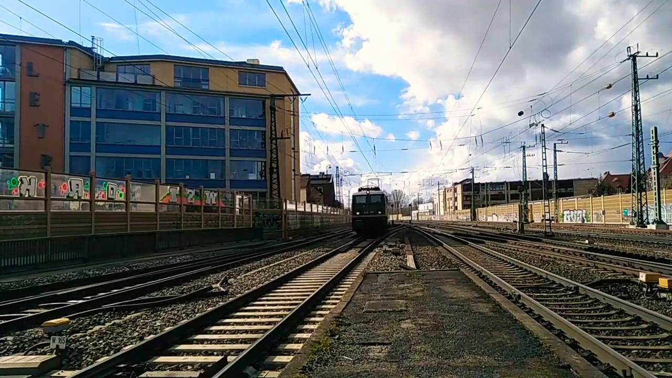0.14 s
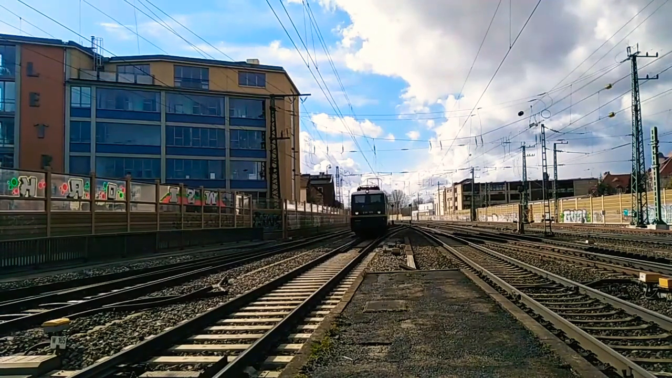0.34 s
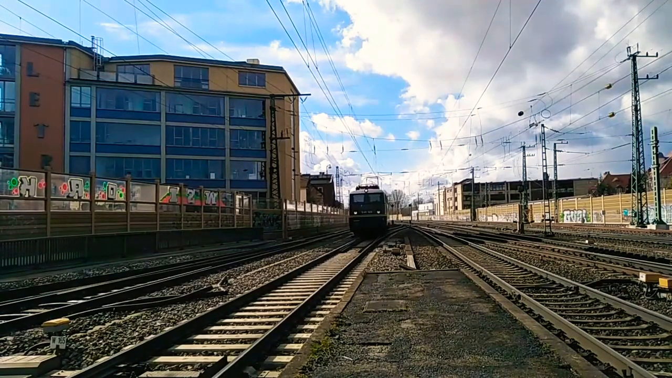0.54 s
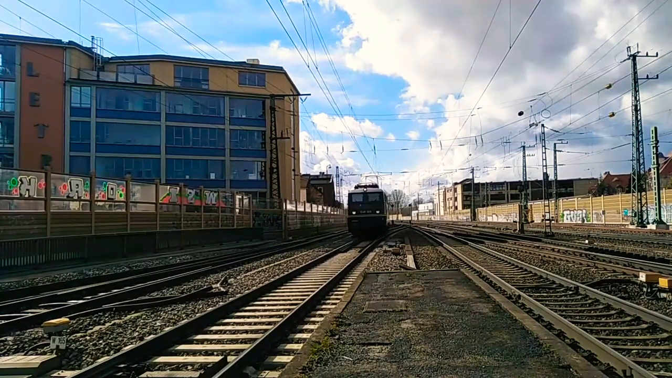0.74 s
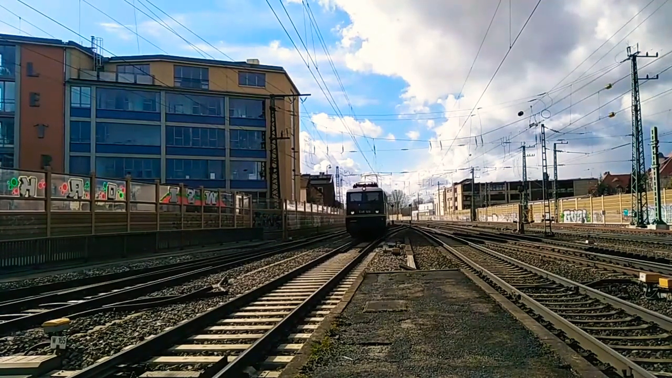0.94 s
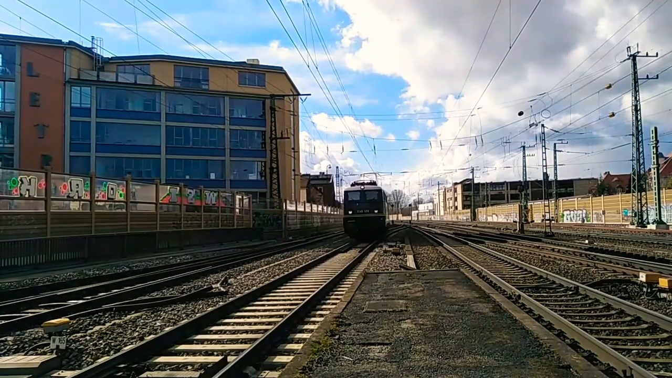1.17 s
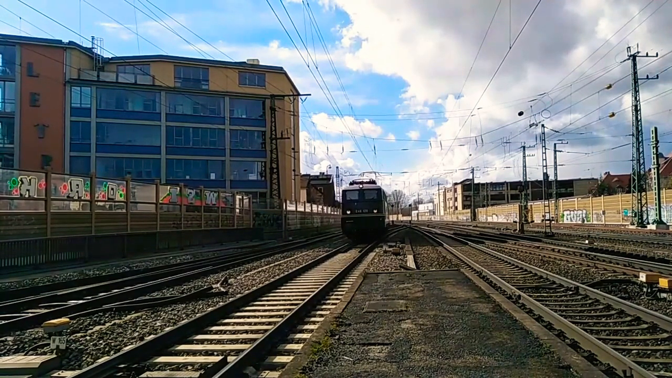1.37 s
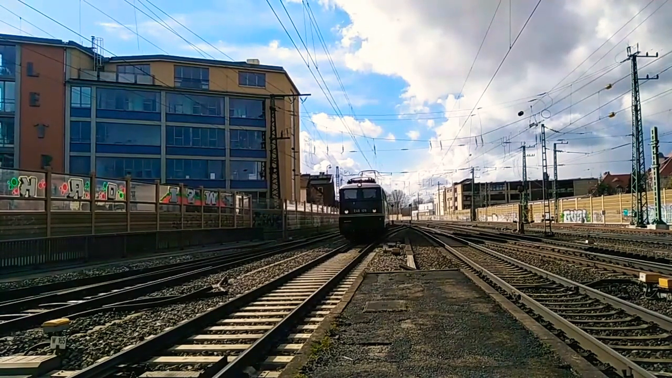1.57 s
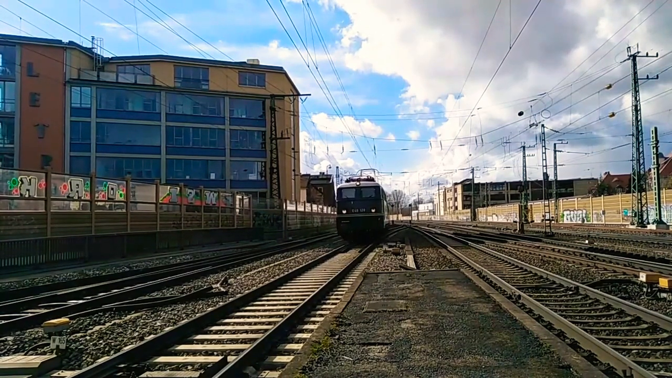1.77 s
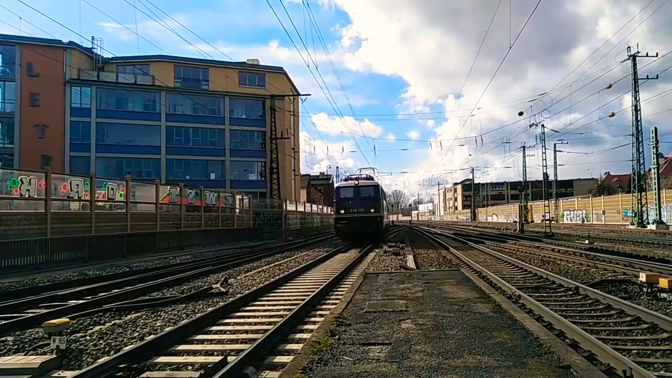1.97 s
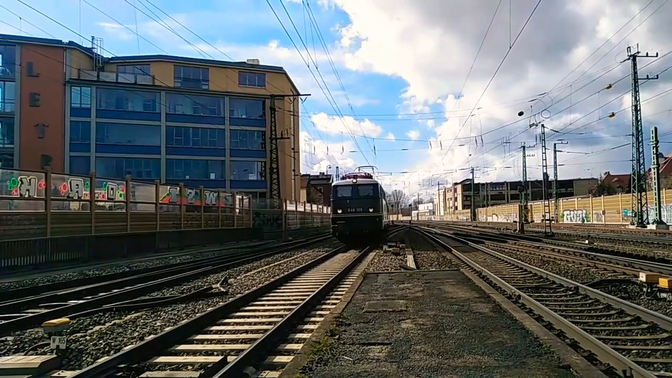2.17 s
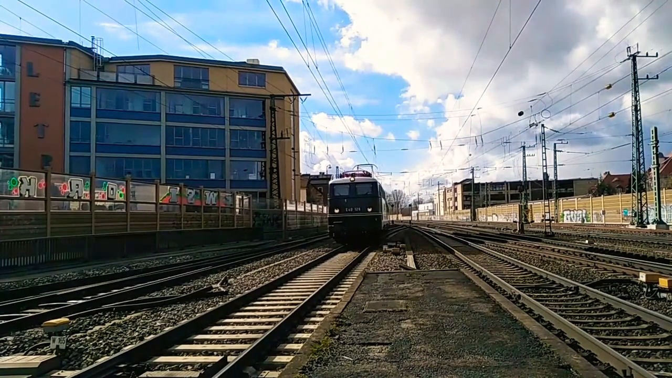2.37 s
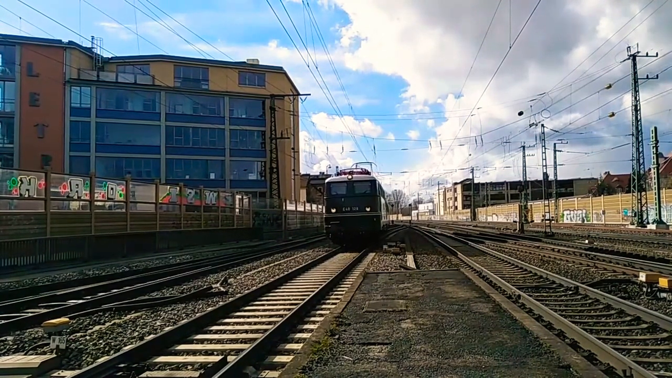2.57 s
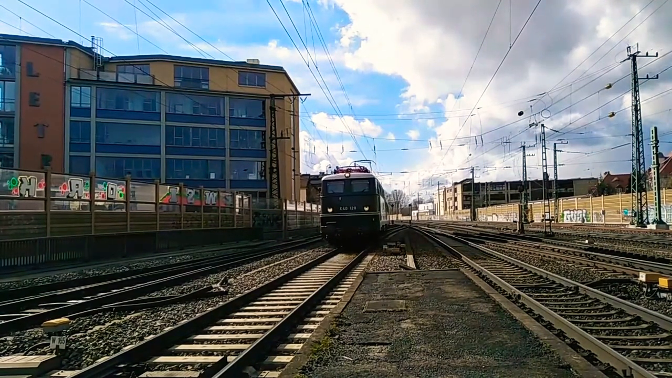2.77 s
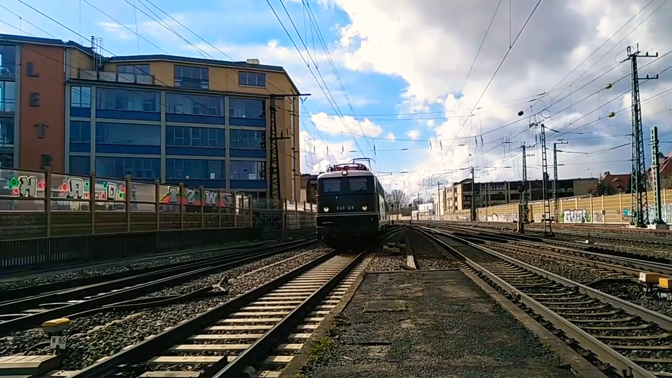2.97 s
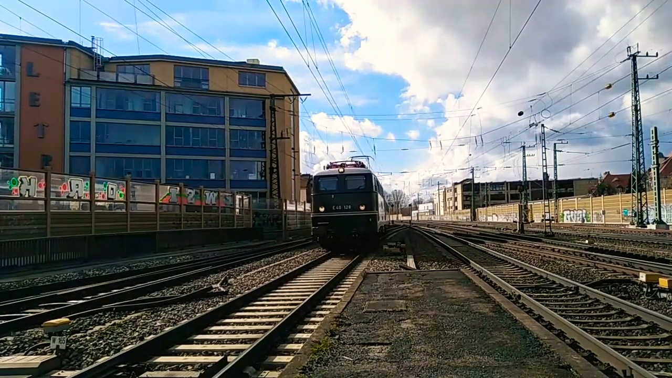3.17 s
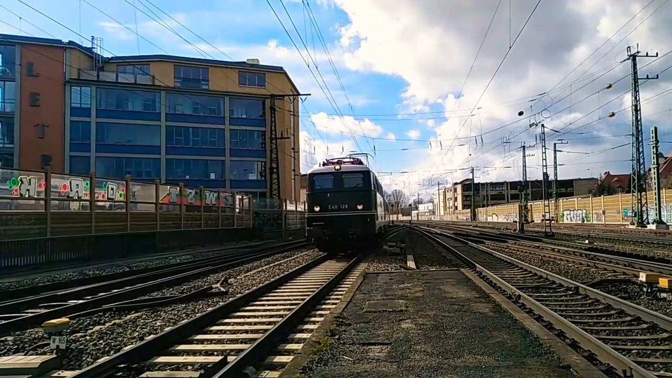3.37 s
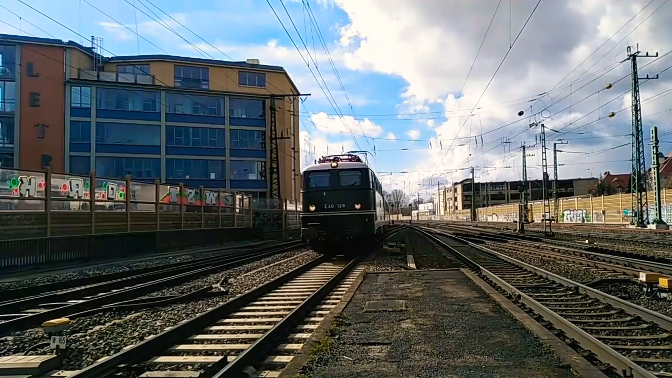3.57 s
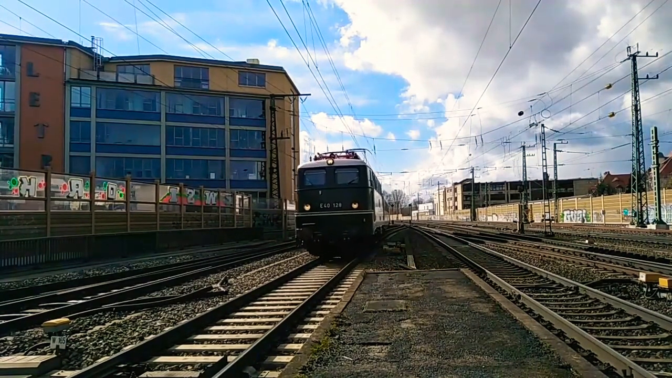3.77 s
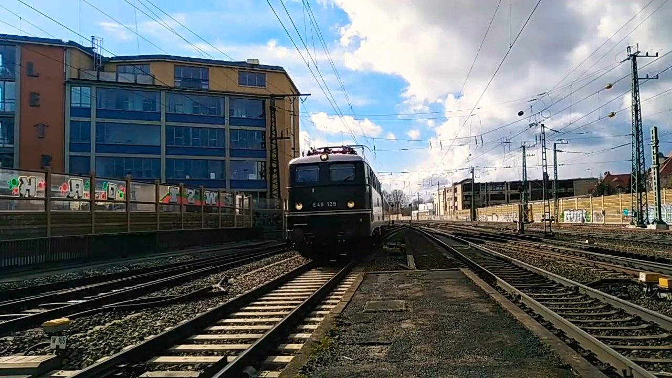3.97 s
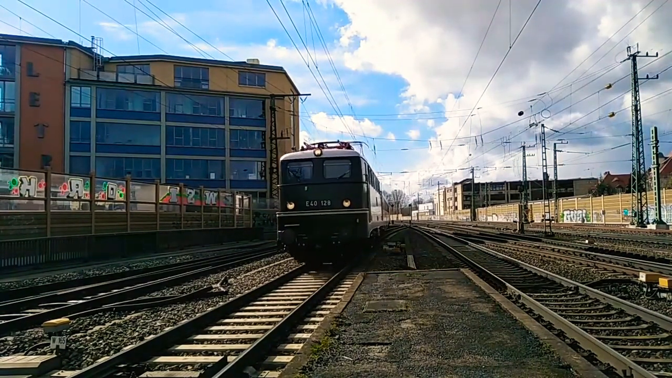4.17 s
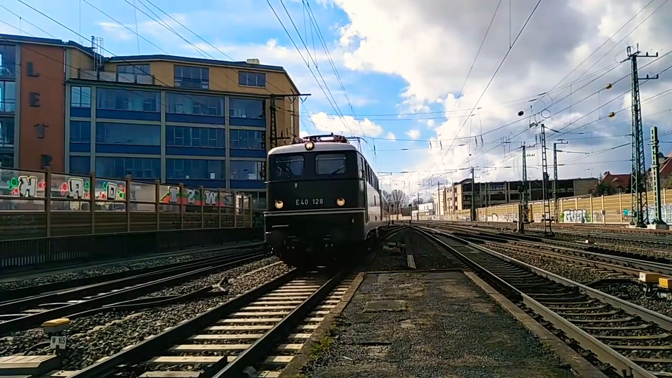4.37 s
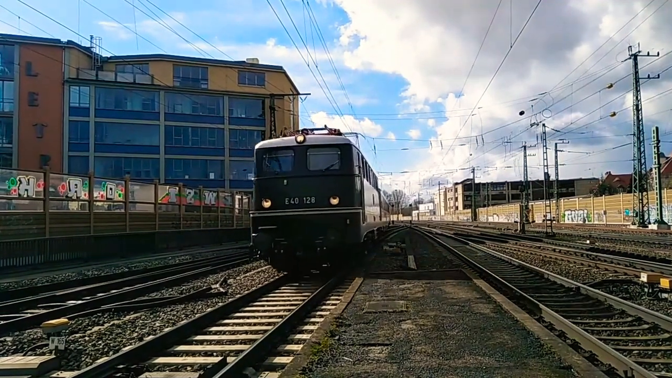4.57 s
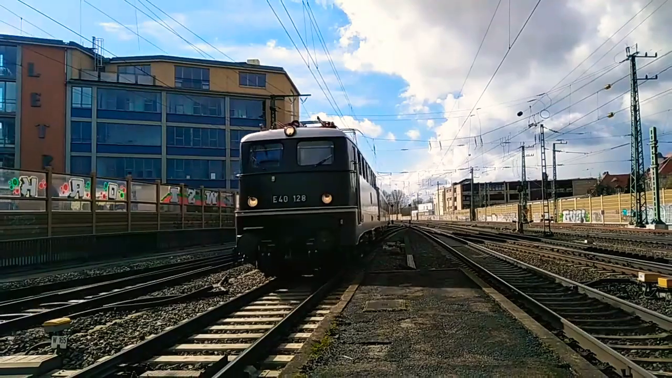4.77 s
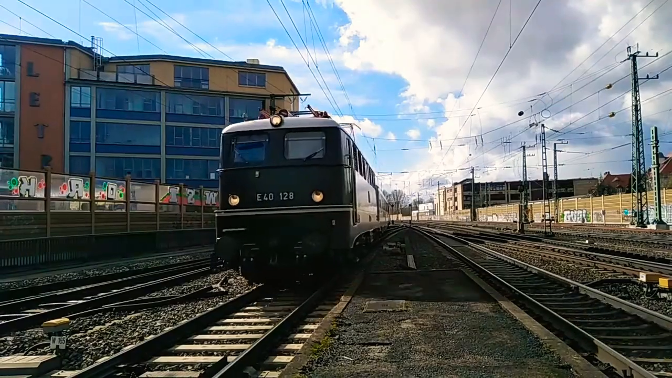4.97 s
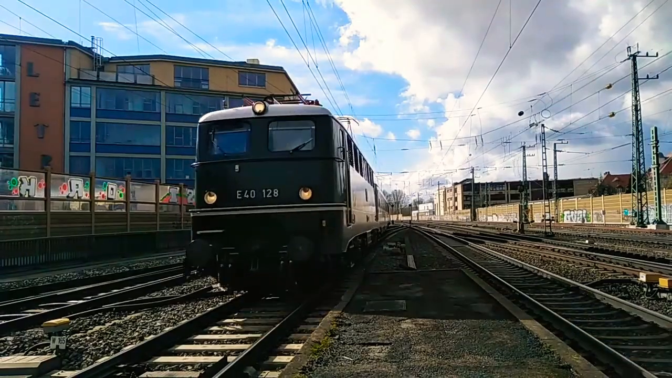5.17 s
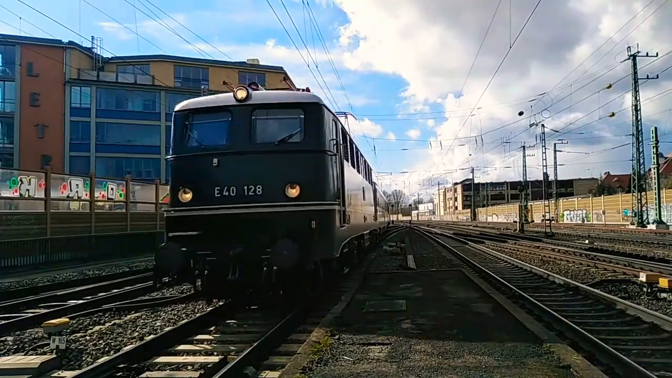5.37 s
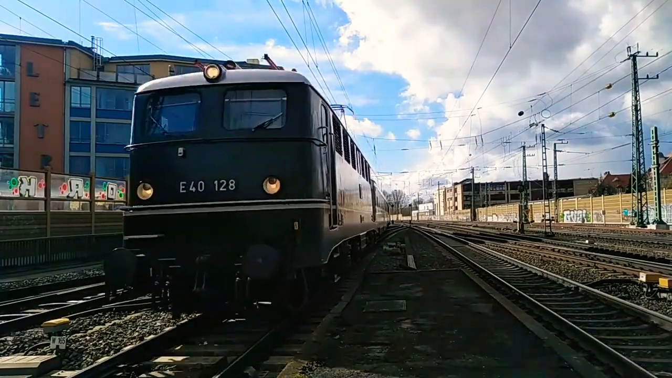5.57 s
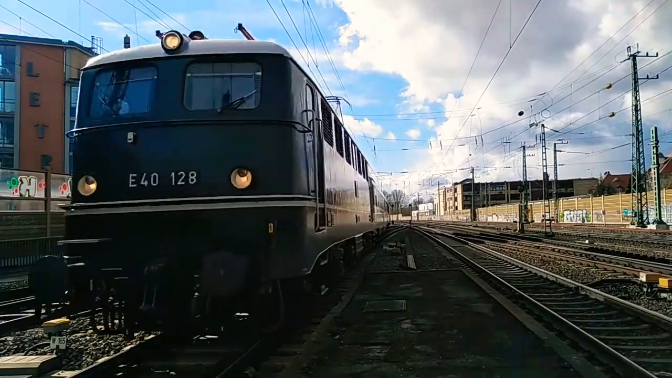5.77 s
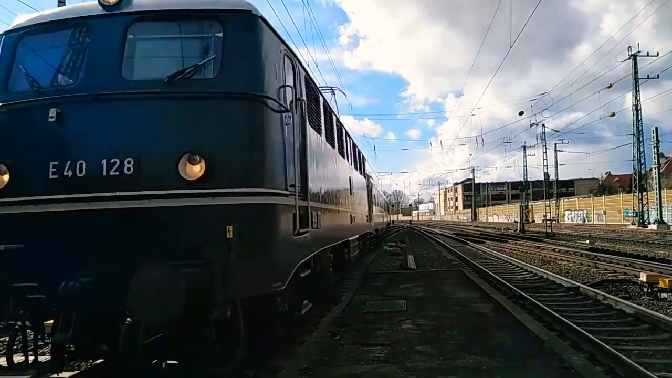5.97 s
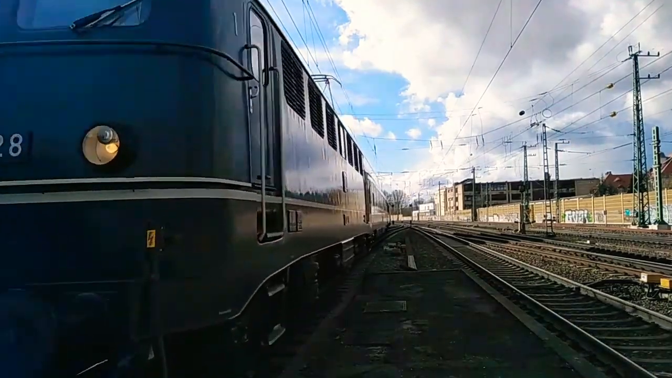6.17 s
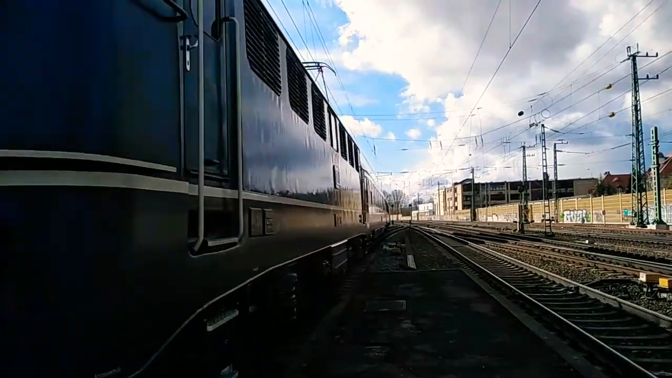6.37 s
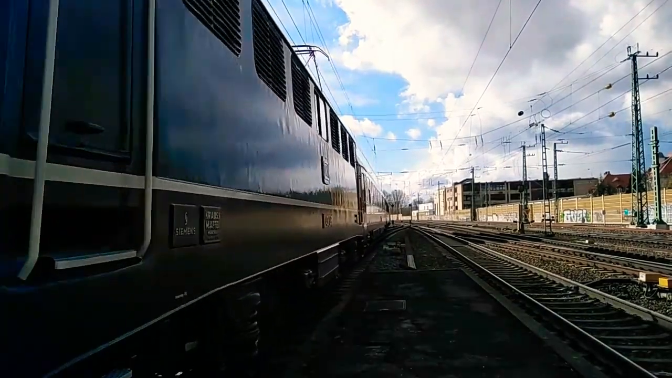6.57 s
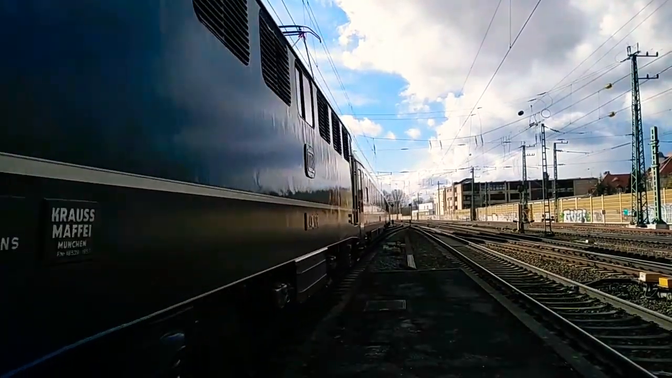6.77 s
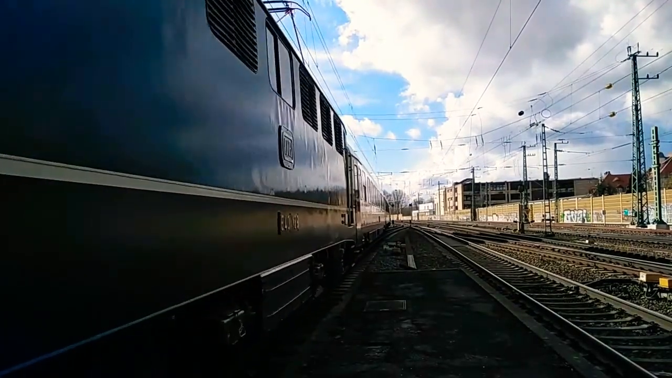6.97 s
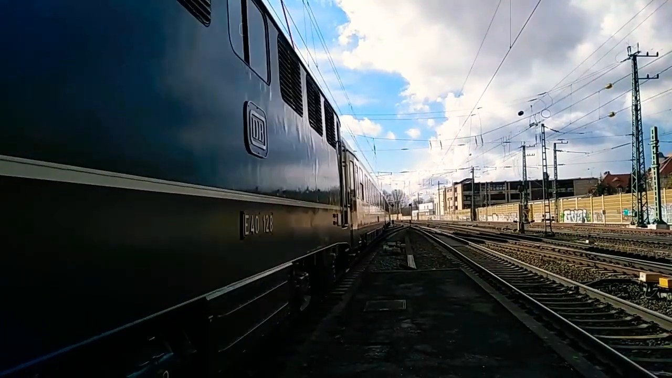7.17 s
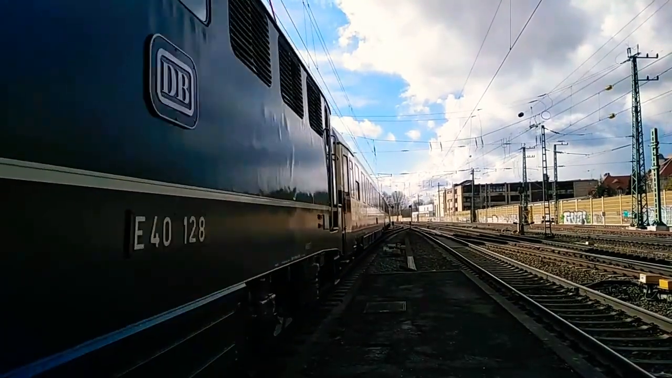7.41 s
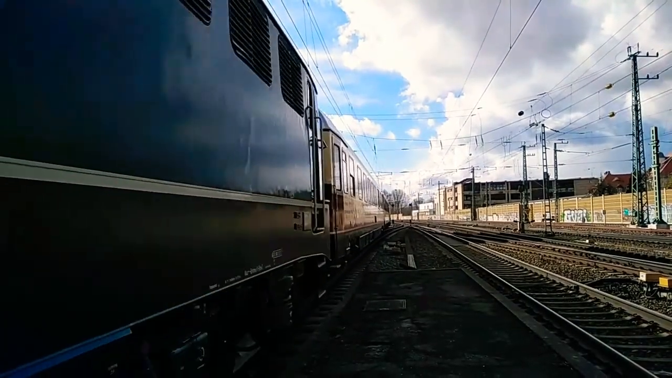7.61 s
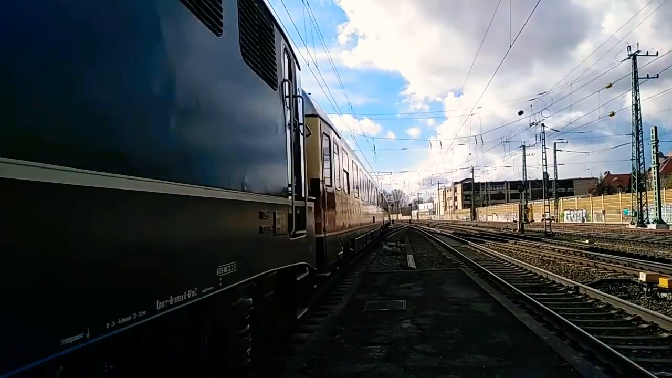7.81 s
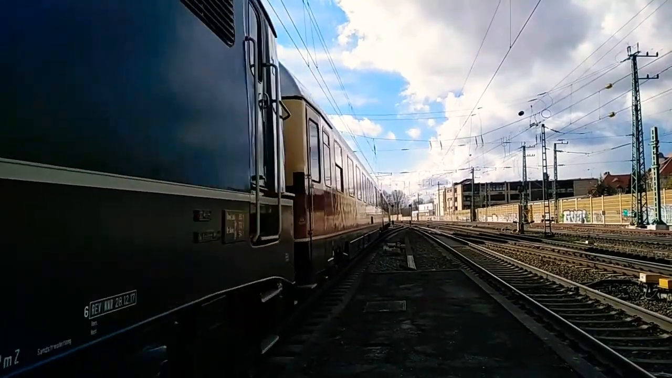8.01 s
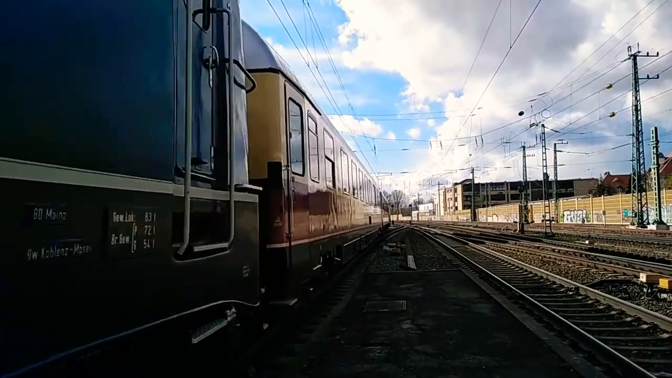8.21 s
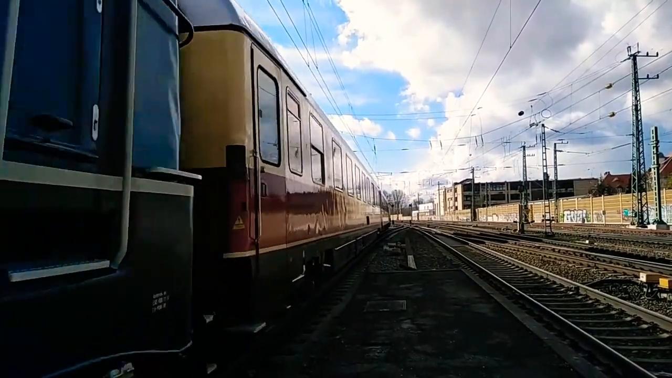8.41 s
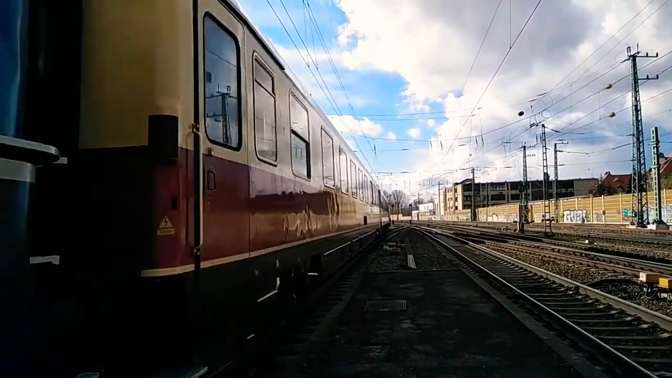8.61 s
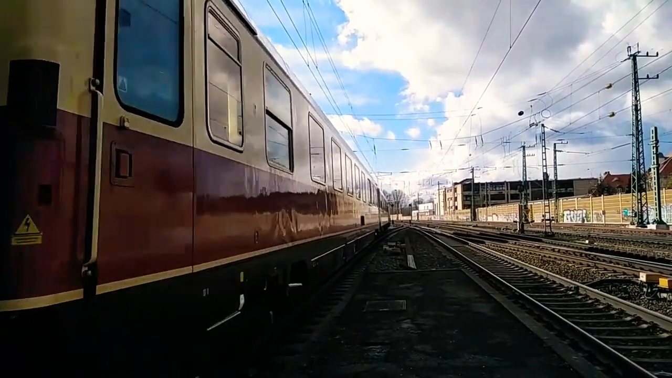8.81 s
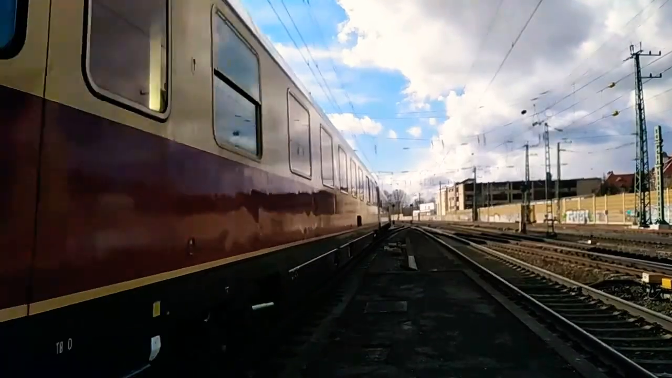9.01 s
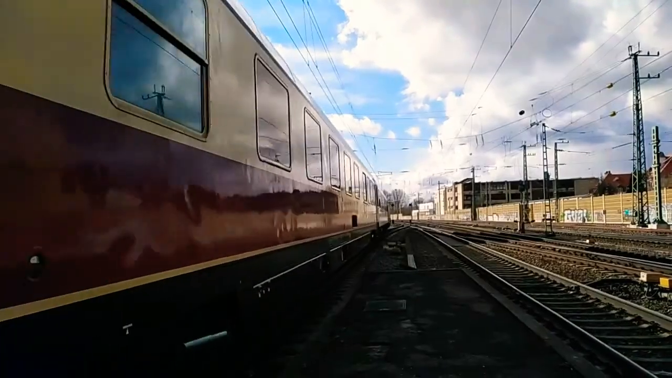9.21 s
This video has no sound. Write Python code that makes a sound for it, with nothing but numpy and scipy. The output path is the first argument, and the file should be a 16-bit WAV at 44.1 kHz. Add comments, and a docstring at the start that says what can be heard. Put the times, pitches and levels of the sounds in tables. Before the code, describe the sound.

A distant electric train hums and rumbles, its switchgear snapping crisply every so often. After three seconds comes a breathy puff, then a brief, piercing air-whistle toot with a low thump and scattered yard echoes. The train swells into a broad roar a few metres from the stereo microphones, with knocks, sliding fan tones and deep ringing wheel thuds, continuing as the first coach passes.

```python
"""Trackside in a rail yard, two microphones: an electric locomotive nears with coaches at 8.1 m/s, humming low.
Its tap changer snaps from notch to notch in bursts of noise; the air whistle, a set of partials over rushing
air, gives a puff and one overblown toot with a low thump, thrown back by walls; the rumble swells around it. A
dull knock comes from the track ahead, then the running gear knocks; two motor blowers, wavering tones, drop in
pitch as they pass a few metres off. Wheel noise grows to a roar and bogies ring over a joint; a limiter ducks
under the toot and heaviest thuds."""
import sys
import numpy as np
from scipy import signal
from scipy.fft import rfft, irfft
from scipy.io import wavfile
from scipy.ndimage import uniform_filter1d

SR = 44100
rng = np.random.default_rng(int(sys.argv[2]) if len(sys.argv) > 2 else 0)


def output_pcm(signal):
    """Save a mono or channel-first signal as 16-bit PCM at the path in sys.argv[1].

    Samples are clipped to [-1, 1] before scaling.
    """
    pcm = np.clip(np.atleast_2d(signal).T, -1, 1) * 32767
    wavfile.write(sys.argv[1], SR, np.round(pcm).astype(np.int16))


N = 407925
TIME = np.arange(N) / SR
SPEED = 8.1  # of the train, m/s


def gain_of(db):
    """Decibels to a factor."""
    return 10 ** (np.asarray(db) / 20)


def evened(x):
    """Scaled to an rms of one."""
    return x / np.sqrt(np.mean(x ** 2) + 1e-20)


def read(points, hz):
    """A spectrum table at the frequencies hz, joined on a log axis."""
    f, value = np.transpose(points)
    return np.interp(np.log(hz + 1), np.log(f + 1), value)


def drift(hz):
    """Slow chance of unit rms, up to about hz."""
    knots = np.arange(0, TIME[-1] + 1, .5 / hz)
    return evened(np.interp(TIME, knots, rng.standard_normal(len(knots))))


def noise(colour):
    """Two unrelated channels of noise, shaped by a colour table."""
    f = np.fft.rfftfreq(N, 1 / SR)
    spectrum = rfft(rng.standard_normal((2, N))) * gain_of(read(colour, f))
    return evened(irfft(spectrum, N))


def envelope(age, attack, hold, release):
    """A smooth rise times an exponential fade that starts at hold (all s)."""
    rise = np.sin(np.pi / 2 * np.clip(age / attack, 0, 1)) ** 2
    return rise * np.exp(-np.maximum(age - hold, 0) / release)


def falloff(t, abreast, metres, spread_db):
    """Level/dB of a passing source, relative to its closest moment."""
    distance = np.hypot(SPEED * (t - abreast), metres)
    return -spread_db * np.log10(distance / metres)


def doppler(t, abreast, metres):
    """Pitch factor of a source that passes at the given time and distance: high nearing, low leaving."""
    along = SPEED * (t - abreast)
    return 1 - along / np.hypot(along, metres) * SPEED / 343


# Relative colour of the rolling noise, train far down the track and abreast: (f/Hz, level/dB per Hz)
FAR_COLOUR = [(40, -10.5), (80, -3.5), (150, -3), (200, -3.5), (270, -0.5), (370, -7.5), (600, -6.5),
              (1000, -13.5), (1800, -17), (3200, -34.5), (4800, -41), (8200, -42), (9800, -53),
              (14500, -63)]
NEAR_COLOUR = [(40, -37), (78, -2), (130, -2), (200, 1), (290, -4.5), (400, -8), (700, -11.5), (1000, -15),
               (2000, -20.5), (3200, -26), (4500, -28), (8000, -31), (10000, -38), (14500, -51.5)]
# Narrow whines of motors and gears above the hiss:
# (f/Hz, width/Hz, lift far off/dB, extra lift abreast/dB, abreast t/s)
GEAR_WHINES = [(2720, 175, 4.5, 9, 7.43), (3550, 100, -4, 14.5, 8.27), (5240, 78, 9.5, 2, 7.7),
               (7860, 1060, 8, 1, 6.1), (7880, 170, 1.5, 5, 7)]
# Wheel groups of the locomotive and first coach:
# (abreast t/s, distance/m, rumble level/dB, rail roar level/dB, hiss level/dB)
WHEEL_GROUPS = [(7.05, 2.63, -17.5, -17, -26.5), (7.3, 1.45, -12, -23, -64), (8.08, 2.8, -14.5, -18, -30),
                (8.66, 2.17, -15.5, -21.5, -28.5), (9.0, 2.8, -18, -27, -49)]
# Loss for each tenfold distance: (rumble/dB, rail roar/dB, hiss/dB)
ROLLING_SPREAD = (19, 19.5, 16)
# Left-right likeness at the microphones, train far off and abreast: (f/Hz, likeness -1 to 1)
LIKENESS_FAR = [(60, 0.86), (180, 1), (540, 0.68), (1600, 0.08), (4500, 0.027)]
LIKENESS_NEAR = [(60, .25), (150, .45), (300, .64), (600, .72), (1400, .3), (4000, .03)]
SWELL_S, SWELL_WIDTH_S, SWELL_DB = 3.5, 0.69, 2  # the rumble swells for a while around the toot


def rolling(patchy_db=1.0, flicker_db=0.5, surge_db=1.5, low_hz=460, high_hz=2600, lag_ms=0.28):
    """Each bogie's rumble, rail roar and hiss swell as it nears; their colour shifts as the train comes abreast."""
    hop, size = 256, 1024
    frames, hz = N // hop + 5, np.fft.rfftfreq(size, 1 / SR)
    t = np.arange(frames)[:, None] * hop / SR
    a, b, c, d, patches = rng.standard_normal((5, frames, 513))
    left, other = a + 1j * b, c + 1j * d

    near = np.interp(t, [3.5, 7.1], [0, 1])
    colour = gain_of((1 - near) * read(FAR_COLOUR, hz) + near * read(NEAR_COLOUR, hz))
    for centre, width, far_db, close_db, abreast in GEAR_WHINES:
        db = far_db + close_db / (1 + ((t - abreast) / 0.39) ** 2)
        offset = hz - centre * doppler(t, abreast, 20.0)
        colour = colour * gain_of(db / (1 + (2 * offset / width) ** 2))

    rumble = 1 / (1 + (hz / low_hz) ** 6)
    hiss = 1 - 1 / (1 + (hz / high_hz) ** 6)
    roar = 1 - rumble - hiss
    power = 0
    for k, band in enumerate((rumble, roar, hiss)):
        layer = colour ** 2 * abs(band)
        arriving = 0
        for abreast, metres, *levels_db in WHEEL_GROUPS:
            db = levels_db[k] + falloff(t, abreast, metres, ROLLING_SPREAD[k])
            arriving = arriving + gain_of(db) ** 2
        power = power + layer / layer.sum(1, keepdims=True) * arriving

    likeness = (1 - near) * read(LIKENESS_FAR, hz) + near * read(LIKENESS_NEAR, hz)
    likeness = np.clip(likeness, -1, 1)
    # close by, the shared sound reaches the right microphone first
    lead_ms = np.interp(t, [6.7, 7.2], [0, lag_ms])
    lead = np.exp(2j * np.pi * hz * lead_ms / 1000)
    right = likeness * left * lead + np.sqrt(1 - likeness ** 2) * other

    patches = evened(uniform_filter1d(uniform_filter1d(patches, 8, axis=0), 16, axis=1))
    flicker = evened(uniform_filter1d(rng.standard_normal((frames, 1)), 4, axis=0))
    surge = evened(uniform_filter1d(rng.standard_normal((frames, 1)), size=24, axis=0))
    swell_db = SWELL_DB * np.exp(-((t - SWELL_S) / SWELL_WIDTH_S) ** 2)
    rumble_db = rumble * (swell_db + surge_db * near * surge)
    unsteady = gain_of(patchy_db * patches + flicker_db * flicker + rumble_db)
    z = np.array([left, right]) * np.sqrt(power) * unsteady
    # overlapping unrelated frames loses power by 1.5
    return np.sqrt(1.5) * signal.istft(z.swapaxes(1, 2), nperseg=size, noverlap=size - hop)[1][:, :N]


def tone(hz, level_db, waver, fading):
    """A fan line: it wavers in pitch and fades differently at each microphone."""
    phase = 2 * np.pi * np.cumsum(hz * (1 + waver * drift(8.94))) / SR
    sides = []
    for _ in range(2):
        steady = np.sin(phase) * (1 + fading * drift(9.5))
        sides.append(steady + fading * drift(12.0) * np.cos(phase))
    return gain_of(level_db) * evened(np.array(sides))


# Motor blowers, front then rear:
# (abreast t/s, distance/m, f/Hz, level abreast before the grille's lift/dB, pitch waver share, fading share)
MOTOR_BLOWERS = [(6.6, 2.11, 440.7, -26, 0.0041, 0.52), (8.9, 4.12, 441.6, -22, 0.00499, 0.48)]
# Air grilles that beam at the listener, one list for each blower: (abreast t/s, width/s, lift/dB)
AIR_GRILLES = [
    [(7.62, 0.73, 15.5)],
    [(7.89, 0.092, 15.5), (8.155, 0.1, 15.5)],
]
# The blowers' note scattered by walls, smeared by many Doppler shifts: (f/Hz, relative level/dB per Hz)
SCATTERED_NOTE = [(380, -44), (425, 4), (442, 10.5), (454, -2), (470, -51.5)]
BLOWER_SPREAD_DB, SCATTERED_SPREAD_DB = 16.5, 16.5  # loss for each tenfold distance
SCATTERED_DB, HUM_DB = -28, -40.5  # scattered note when abreast; upper note of the hum


def blowers():
    """Front and rear blower pass, each with a Doppler drop and grille beams, over a low two-note hum."""
    out = tone(255.0, HUM_DB, waver=0.0063, fading=0.11)
    out = out + tone(150.0, HUM_DB - 2.5, waver=0.06, fading=0.5)
    for (abreast, metres, hz, db, waver, fading), grilles in zip(MOTOR_BLOWERS, AIR_GRILLES):
        beam_db = sum(extra_db * np.exp(-((TIME - s) / width) ** 2) for s, width, extra_db in grilles)
        level_db = db + falloff(TIME, abreast, metres, BLOWER_SPREAD_DB) + beam_db
        out = out + tone(hz * doppler(TIME, abreast, metres), level_db, waver, fading)
        scattered_db = SCATTERED_DB + falloff(TIME, abreast, metres, SCATTERED_SPREAD_DB)
        out = out + noise(SCATTERED_NOTE) * gain_of(scattered_db)
    return out


# Tap changer notches, levels relative to one another: (t/s, snap level/dB, contact level/dB, latch level/dB)
TAP_NOTCHES = [(.366, -14, -18.5, -28), (.557, -14, -18, -26), (1.116, -15.5, -18, -27),
               (2.100, -12.5, -18.5, -27), (2.834, -12, -15.5, -24), (4.255, -12, -18, -24),
               (4.944, -11, -17.5, -23.5), (5.134, -11, -14.5, -18.5)]
# Blows that make up snap, contact and latch, one list each: (t after the main snap/s, relative level/dB, decay/s)
LINKAGE_BLOWS = [
    [(-.02, -16, 0.0016), (-.011, -13, 0.0034), (0, -0.5, 0.002)],
    [(.044, -1, 0.0019), (.047, -4, .0028)],
    [(.079, -2.5, 0.0046)],
]
# Colour of the snaps: (f/Hz, relative level/dB per Hz)
SNAP_COLOUR = [(800, -9), (2200, -6), (3000, -1.5), (4500, -8), (6500, -1), (8000, 8.5), (10000, -8),
               (14500, -16)]


def tap_changer(level_db=2.5, ring_db=-26, ring_s=0.017):
    """Each notch is a snap, a bouncing contact and a latch: noise bursts with a fast decay and a fainter slow one."""
    power, age = np.zeros(N), np.arange(SR // 4) / SR
    for s, *stages_db in TAP_NOTCHES:
        for db, blows in zip(stages_db, LINKAGE_BLOWS):
            for after, blow_db, decay in blows:
                start = round((s + after) * SR)
                fade = np.exp(-age / decay) + gain_of(ring_db) * np.exp(-age / ring_s)
                blow = (1 - np.exp(-age / 0.0016)) * fade
                power[start:start + len(age)] += (gain_of(db + blow_db) * blow) ** 2
    return gain_of(level_db) * np.sqrt(power) * noise(SNAP_COLOUR)


# Time the yard's echoes take to die by 60 dB: (f/Hz, t60/s)
YARD_T60 = [(300, 0.58), (900, 2.4), (2700, 1.78), (3600, 2.3), (8000, 0.85), (13000, 0.26)]


def yard(x):
    """Scattered echoes of the rail yard: sparse random taps, each band dying at its own speed."""
    taps = rng.standard_normal((2, 2 * SR)) * (rng.random((2, 2 * SR)) < .06)
    hz, t, z = signal.stft(taps, SR, nperseg=256)
    fade = gain_of(-60 * t / read(YARD_T60, hz)[:, None])
    onset = 1 - np.exp(-t / 0.0043)
    tail = signal.istft(z * fade * onset, SR, nperseg=256)[1]
    return signal.fftconvolve(np.atleast_2d(x), tail / np.linalg.norm(tail[0]), axes=1)[:, :N]


# Whistle blasts, a puff and a toot: (start t/s, valve open/s, top f/Hz, fundamental level/dB,
# overblown partials level/dB, escaping air level/dB, air lasts/s, air fade/s)
WHISTLE_BLASTS = [(3.083, 0.025, 870, -11, -34, -18.5, 0.033, 0.034),
                  (3.422, .094, 896.8, -0.5, 2, -13, 0.13, 0.049)]
# Partials that come with overblowing: (multiple of the pitch, relative level/dB, attack/s, flutter 0-1)
OVERBLOWN_PARTIALS = [(2, -33, 0.04, 0), (3, -3.5, 0.11, 0.11), (4, -19.5, 0.032, 0.45),
                      (5, -26.5, 0.089, 1), (6, -21.5, 0.1, 1)]
# pressure builds and drains; without it the pitch lies lower by the share SAG
BUILD_S, DRAIN_S, SAG = 0.0537, 0.0177, 0.061
# the fundamental speaks first and starts to give way by JUMP_S
LOW_ATTACK_S, JUMP_S = 0.095, 0.056
RING_ON_S, RELEASE_S = 0.0063, 0.013  # the pipe sounds on after the valve shuts, then dies


def pipe(delay, shift, low_extra_db, lag, dull_db, waver=0.0064):
    """The whistle speaks on its fundamental, then jumps to the third partial; the right side lags by lag radians."""
    out, age = np.zeros((2, N)), np.arange(SR // 3) / SR
    for start, hold, top_hz, low_db, high_db, *_ in WHISTLE_BLASTS:
        first = round((start + delay) * SR)
        span = slice(first, first + len(age))
        pressure = envelope(age, BUILD_S, hold, DRAIN_S)
        hz = shift * top_hz * (1 - SAG * (1 - pressure))
        # the turbulent jet shakes the pitch, which blurs the upper partials most
        phase = 2 * np.pi * np.cumsum(hz * (1 + waver * drift(140.0)[span])) / SR
        phase = phase - np.array([[0], [lag]])
        shake = drift(170.0)[span]
        sounding = hold + RING_ON_S
        overblown = 0
        for k, db, attack, flutter in OVERBLOWN_PARTIALS:
            # on long paths each partial above the third loses dull_db more
            level = gain_of(high_db + db - dull_db * max(k - 3, 0))
            swell = envelope(age, attack, sounding, RELEASE_S) * (1 + flutter * shake)
            overblown = overblown + level * swell * np.sin(round(k) * phase)
        low = gain_of(low_db + low_extra_db) * envelope(age, LOW_ATTACK_S, min(sounding, JUMP_S), RELEASE_S)
        out[:, span] = np.sqrt(2) * (low * np.sin(phase) + overblown)
    return out


# Escaping air, coloured by the pipe's resonances: (f/Hz, relative level/dB per Hz)
AIR_COLOUR = [(150, -27), (600, -3.5), (950, -2.5), (1350, -7), (1800, -6.5), (2150, -5), (2600, -0.5),
              (3100, -7.5), (3500, -6), (4000, -9.5), (4500, -7.5), (4900, -4.5), (5400, -6), (5800, -6.5),
              (6800, -0.5), (8300, 3.5), (10500, -5.5), (14500, -18)]
# Echoes from walls that the train moves away from:
# (delay/s, pitch factor, left level/dB, right level/dB, extra on the fundamental/dB)
WALL_ECHOES = [(.038, 0.98, -15, -1.5, -10), (.092, 0.99, -3, -4.5, -8), (.138, 0.99, -10, -9, -9),
               (.207, 0.978, -12.5, -13.5, 4.5), (.256, .99, -13, -10.5, -12), (.36, .98, -29, -27, -3)]
AIR_ATTACK_S, SPURT_DB, SPURT_S = 0.02, 1, 0.022  # the first air out of the valve is the strongest
PIPE_HZ, PIPE_FEEDBACK = 886, 0.22  # the air rings in the pipe: its pitch, and the share that comes back once


def whistle(tail_db=-11, tail_low_db=-9, air_tail_db=-12, air_echo_db=-10, gust_db=2, dull_db=4,
            tail_dull_db=5, tail_shift=0.99, tail_waver=0.0175, lag=0.35):
    """Pipe tone and rushing air; echoes return lower because the train runs away from the walls."""
    direct = pipe(0, 1, 0, lag, 0)
    echoes = 0
    for delay, shift, left_db, right_db, low_db in WALL_ECHOES:
        echo = pipe(delay, shift, low_db, rng.uniform(0, np.pi), dull_db)
        echoes = echoes + gain_of([[left_db], [right_db]]) * echo

    flow = 0
    for start, *_, air_db, lasts, fade in WHISTLE_BLASTS:
        age = TIME - start
        spurt_db = SPURT_DB * np.exp(-((age - AIR_ATTACK_S) / SPURT_S) ** 2)
        flow = flow + gain_of(air_db + spurt_db) * envelope(age, AIR_ATTACK_S, lasts, fade)
    air = noise(AIR_COLOUR) * flow
    air = air + PIPE_FEEDBACK * np.roll(air, round(SR / PIPE_HZ), axis=1)
    air = air * gain_of(gust_db * drift(150.0))
    # the nearest wall returns the air with its sides swapped
    nearest_wall = gain_of(air_echo_db) * np.roll(air[::-1], round(WALL_ECHOES[0][0] * SR), axis=1)

    scattered = gain_of(tail_db) * pipe(0, tail_shift, tail_low_db, 0, tail_dull_db, tail_waver)
    return direct + echoes + air + nearest_wall + yard(scattered + gain_of(air_tail_db) * air)


# Colour of the low thump: (f/Hz, relative level/dB per Hz)
THUMP_COLOUR = [(40, -32), (190, -1), (280, 12), (450, -13), (610, 9), (800, -15), (1500, -45), (6000, -45)]


def low_thump(s=3.428, db=-15, attack_s=0.017, hold_s=.026, decay_s=0.007):
    """A short low thump of noise at the toot's onset, as from overload."""
    return gain_of(db) * envelope(TIME - s, attack_s, hold_s, decay_s) * noise(THUMP_COLOUR)


# Knocks and a short scrape: a dull knock from the track ahead, then the running gear: (t/s, level/dB, centre
# f/Hz, width/octaves, decay/s)
KNOCKS = [(4.64, -22.5, 580, 0.16, 0.032), (5.965, -35, 4480, 0.63, .035),
          (6.695, -15, 628, 0.61, .022), (6.955, -19, 705, 0.42, 0.016), (7.02, -21, 950, .8, 0.01),
          (7.237, -23, 1600, 0.9, .012), (7.406, -20, 1800, 1.2, 0.012),
          (7.777, -26, 1200, 0.63, 0.0064)]


def knocks(attack_s=0.001):
    """Short knocks and clanks from the track ahead and the running gear: bursts of band noise, alike at both
    microphones."""
    out, age = np.zeros((2, N)), np.arange(8192) / SR
    hz = np.fft.rfftfreq(len(age), 1 / SR) + 1
    for s, db, centre, octaves, decay in KNOCKS:
        band = np.exp(-(np.log2(hz / centre) / octaves) ** 2)
        burst = evened(irfft(rfft(rng.standard_normal(len(age))) * band, len(age)))
        out[:, round(s * SR):][:, :len(age)] += gain_of(db) * envelope(age, attack_s, 0, decay) * burst
    return out


# Wheels over a rail joint: (t/s, peak level of the ring/dB)
JOINT_THUDS = [(7.239, -2), (7.31, 0.5), (7.37, -3.5), (7.531, -2.5), (7.658, -2.5), (7.727, -1),
               (7.876, -13), (8.471, -9), (8.799, -4), (8.862, 1)]
# What a bogie rings with, before chance shifts each pitch: (f/Hz, relative level/dB, t60/s)
BOGIE_MODES = [(72, -26, .2), (111.6, 17, 0.11), (171, 12, 0.27), (207, 10, 0.16), (291.8, 10, 0.26),
               (390, -26, .08), (720, -18, .05)]
JOLT_HZ, JOLT_DB, JOLT_S = 16, 0, 0.056  # the track bed heaves: pitch, dB over the thud, decay time


def wheels(spread=0.0774):
    """Each wheel drops over a joint and rings its bogie in decaying modes, while the track bed heaves."""
    out, t = np.zeros((2, N)), np.arange(SR // 3) / SR
    jolt = gain_of(JOLT_DB) * np.sin(2 * np.pi * JOLT_HZ * t) * np.exp(-t / JOLT_S)
    chances = rng.standard_normal((len(JOINT_THUDS), len(BOGIE_MODES), 3))
    for (s, db), chance in zip(JOINT_THUDS, chances):
        ring = 0
        for (hz, mode_db, t60), luck in zip(BOGIE_MODES, chance):
            # chance sets the pitch, and the phase at each microphone
            phase = 2 * np.pi * hz * (1 + spread * luck[0]) * t + luck[1:, None]
            ring = ring + gain_of(mode_db - 60 * t / t60) * np.sin(phase)
        ring = ring * (1 - np.exp(-t / 0.01))
        thud = gain_of(db) * (ring / abs(ring).max() + jolt)
        part = out[:, round(s * SR):][:, :len(t)]
        part += thud[:, :part.shape[1]]
    return out


def scene():
    """The whole pass at the trackside; the yard throws back the snaps as well as the whistle."""
    snaps = tap_changer()
    train = rolling() + blowers() + wheels() + knocks()
    return train + whistle() + low_thump() + snaps + gain_of(-12.5) * yard(snaps)


def limiter(x, ceiling_db=3.0, recover_db_per_s=36, attack_s=0.0036):
    """Peaks over the ceiling turn both channels down after a moment; the gain creeps back."""
    peak_db = 20 * np.log10(abs(x).max(0) + 1e-9)
    fall = recover_db_per_s * TIME
    held_db = np.maximum.accumulate(peak_db + fall) - fall
    over_db = np.maximum(held_db - ceiling_db, 0)
    keep = np.exp(-1 / (attack_s * SR))
    return x / gain_of(signal.lfilter([1 - keep], [1, -keep], over_db))


# The right microphone is duller in the high treble: (f/Hz, left minus right level/dB)
MICROPHONE_TILT = [(700, 0), (2400, -1), (4200, -1), (5600, 5), (7800, 22), (14000, 7.5)]
EDGE_HZ = 14500  # upper band limit


def record(dry, low_cut_hz=59):
    """Unequal microphones, a limiter that ducks under whistle and thuds, a bass cut, overload, then the band limit."""
    hz = np.fft.rfftfreq(N, 1 / SR)
    tilt = gain_of(read(MICROPHONE_TILT, hz) * np.array([[.5], [-.5]]))
    tilt = tilt / np.sqrt((tilt ** 2).mean(0))
    bass = 1 / np.sqrt(1 + (low_cut_hz / (hz + 1)) ** 8)
    heard = limiter(irfft(rfft(dry) * tilt, N))
    heard = irfft(rfft(heard) * bass, N)
    # overload bends peaks smoothly towards full scale
    heard = heard / (1 + (heard * heard) ** 6) ** (1 / 12)
    low_pass = signal.firwin(401, EDGE_HZ, window=("kaiser", 8), fs=SR)
    return signal.oaconvolve(heard, low_pass[None], "same")


dry = scene()
out = record(dry)
output_pcm(out)
```